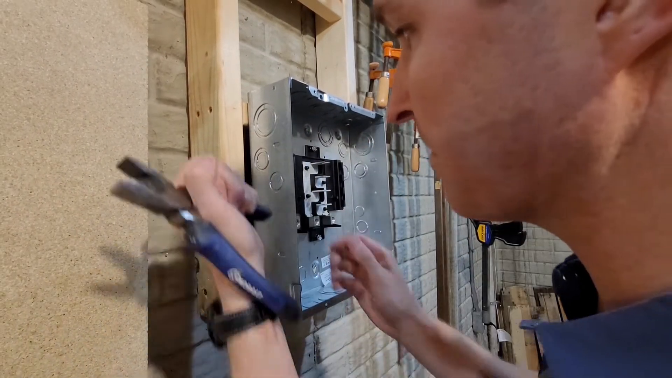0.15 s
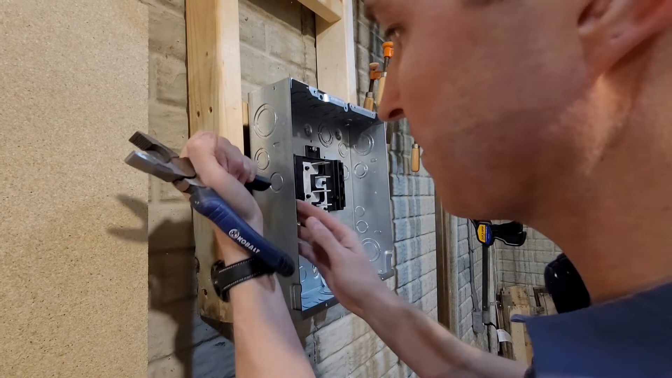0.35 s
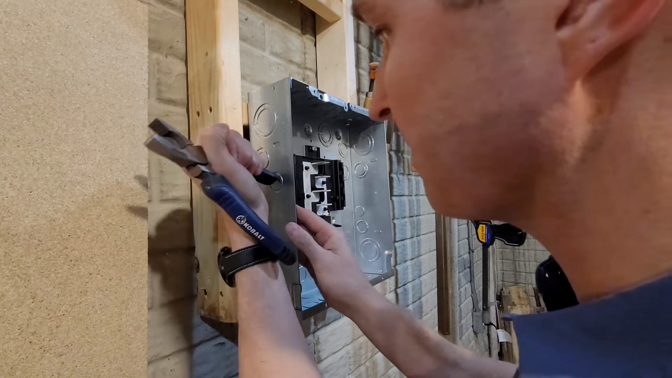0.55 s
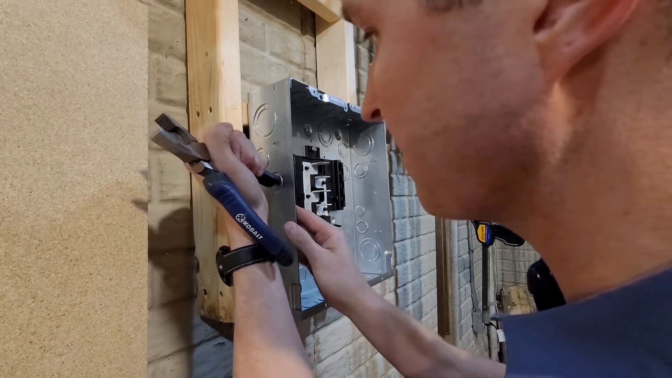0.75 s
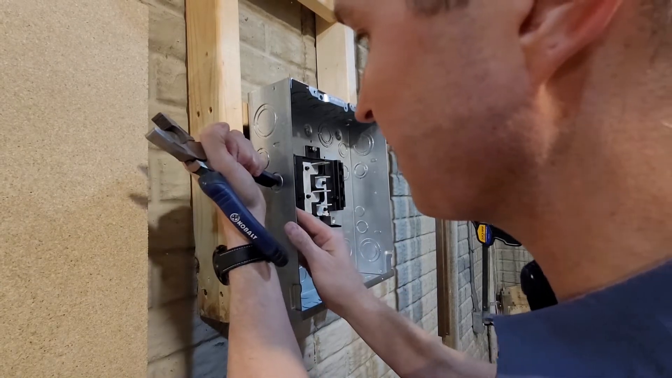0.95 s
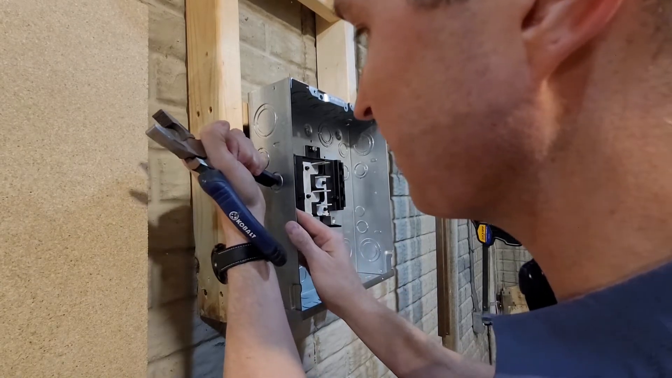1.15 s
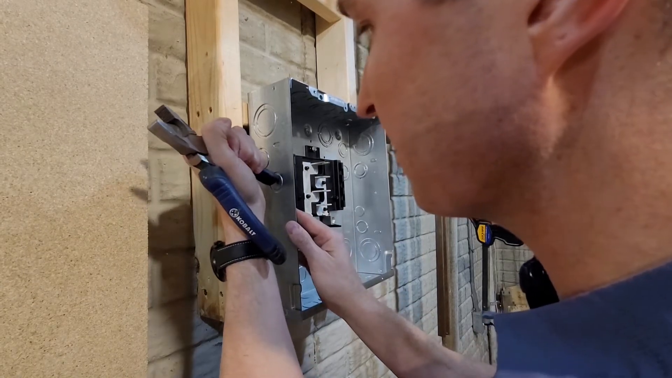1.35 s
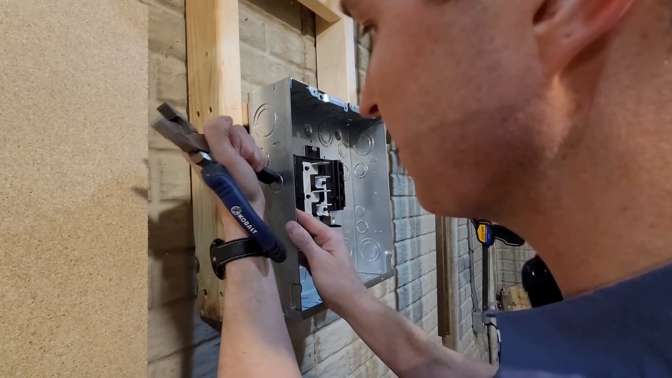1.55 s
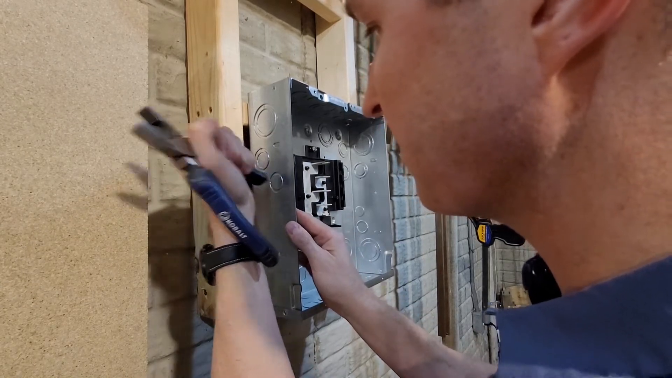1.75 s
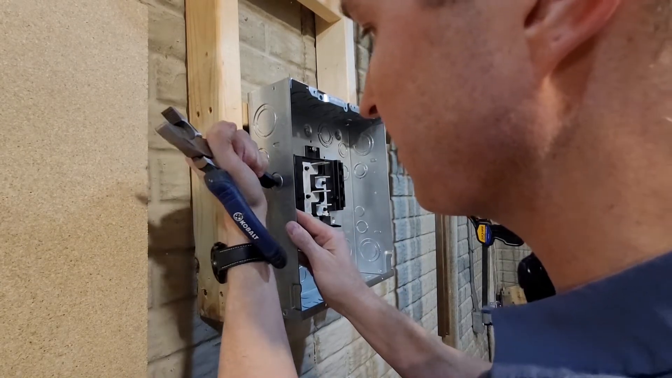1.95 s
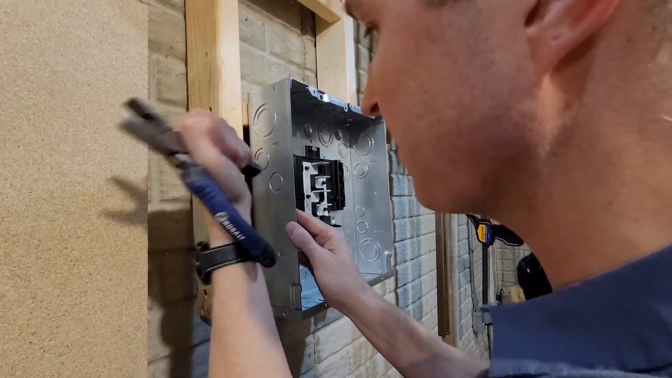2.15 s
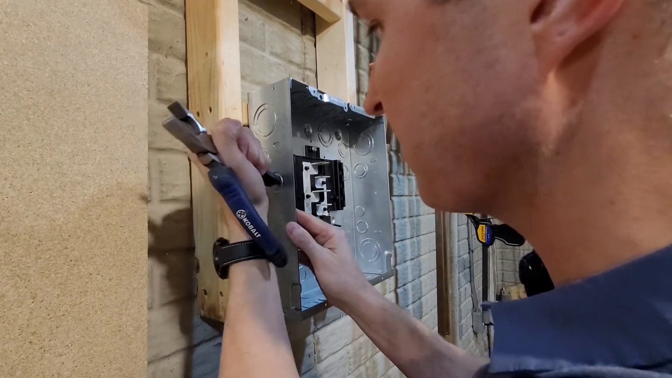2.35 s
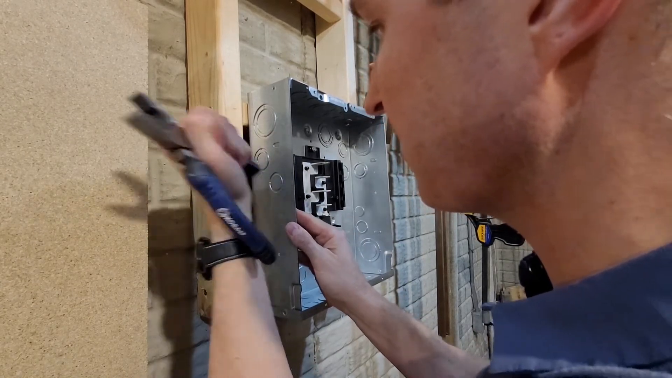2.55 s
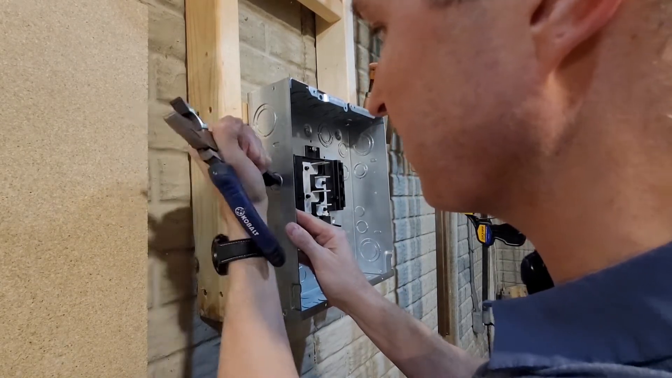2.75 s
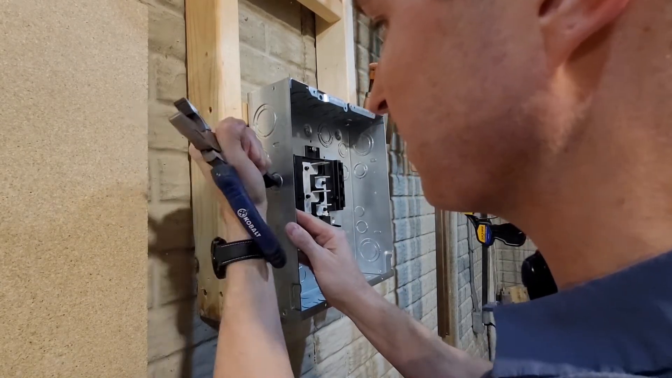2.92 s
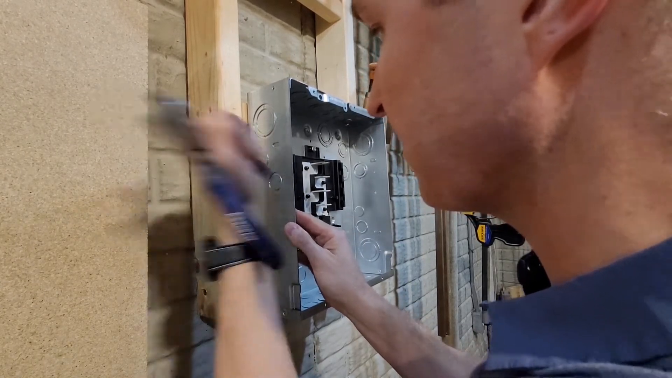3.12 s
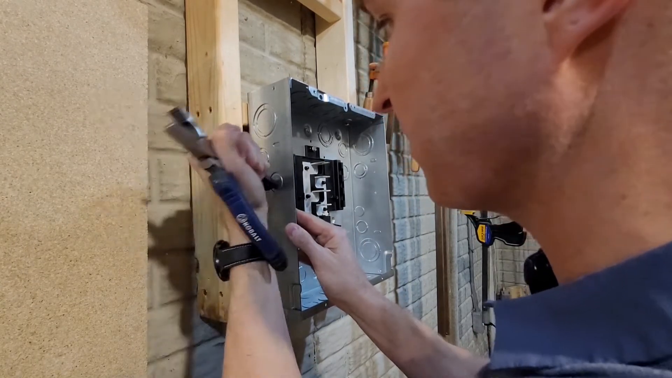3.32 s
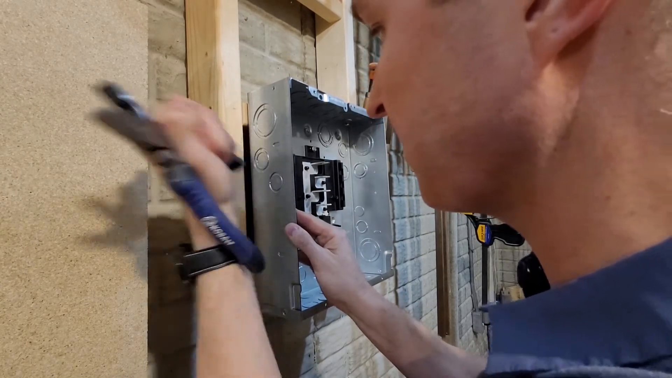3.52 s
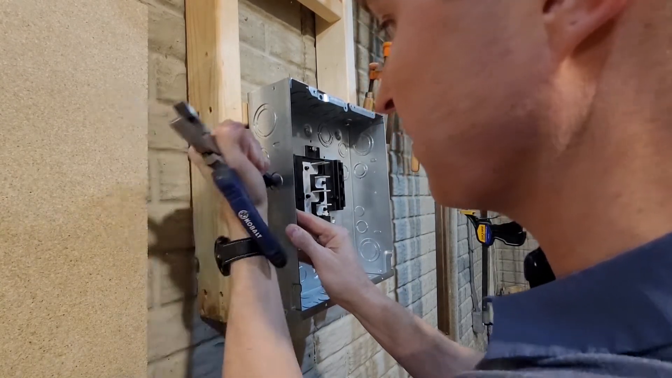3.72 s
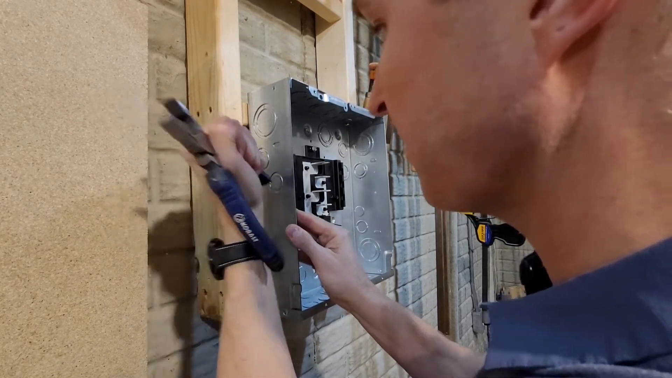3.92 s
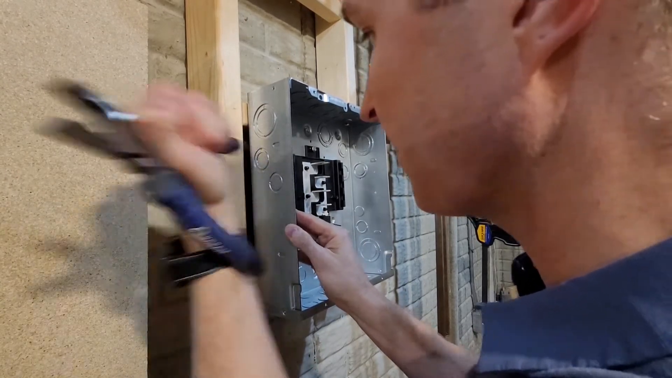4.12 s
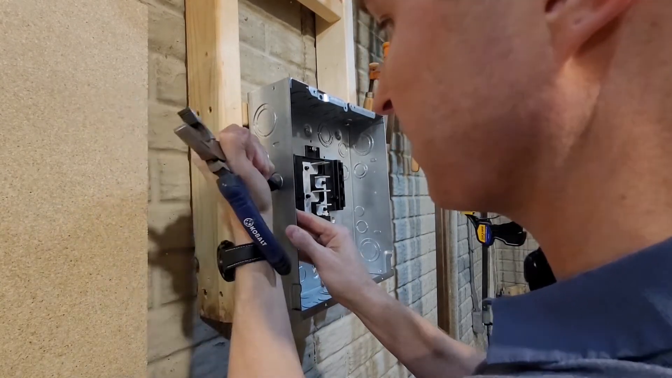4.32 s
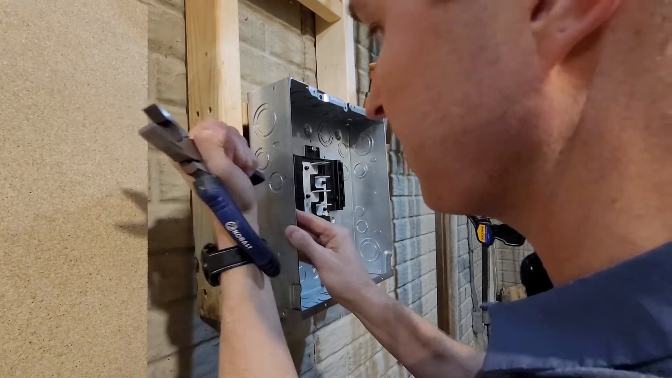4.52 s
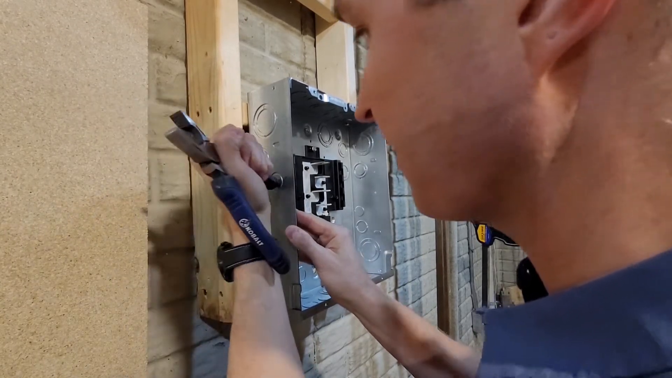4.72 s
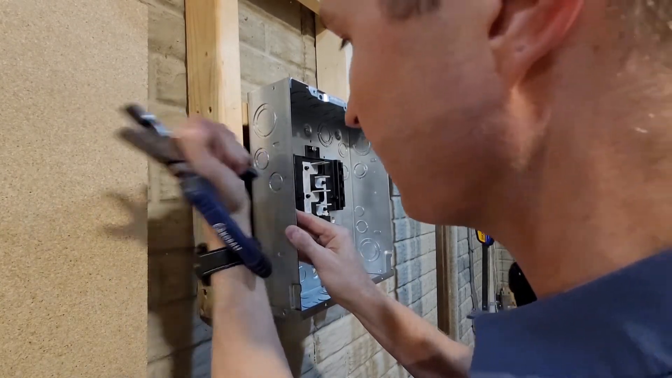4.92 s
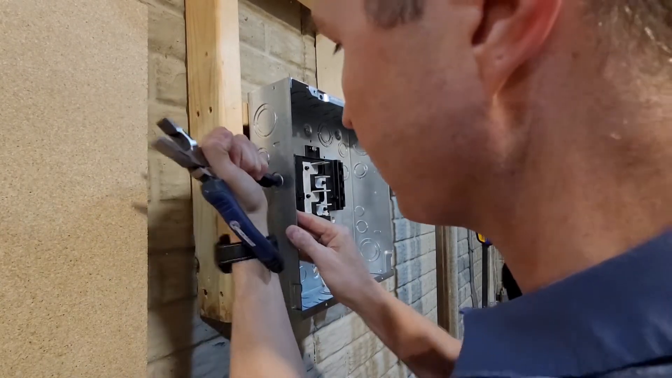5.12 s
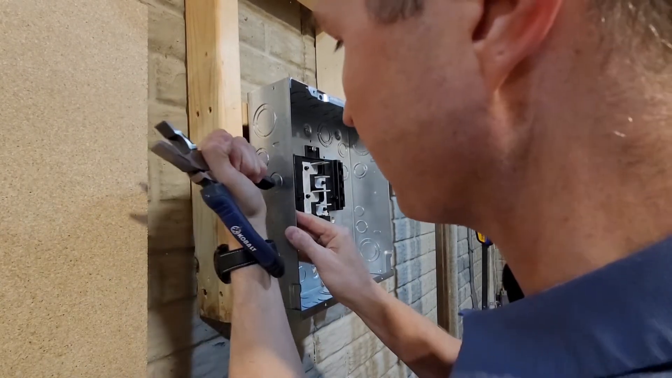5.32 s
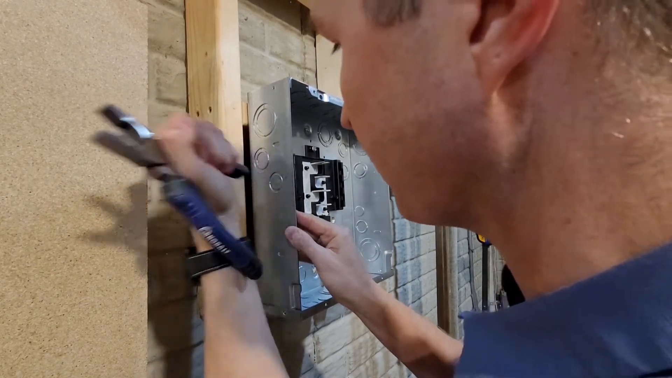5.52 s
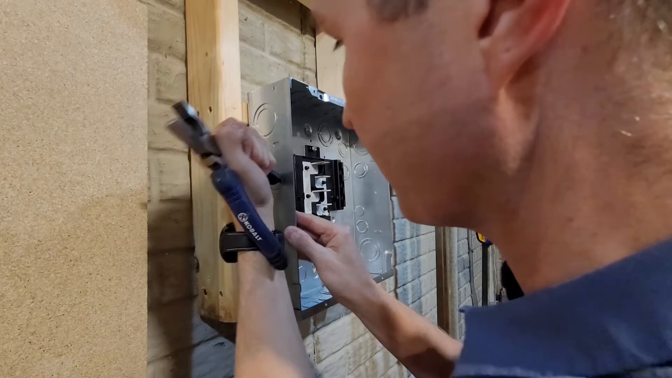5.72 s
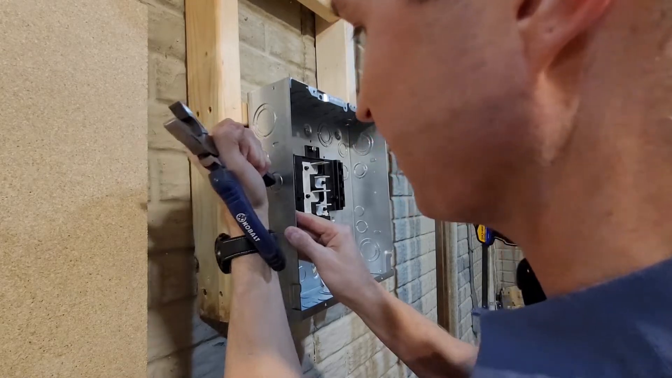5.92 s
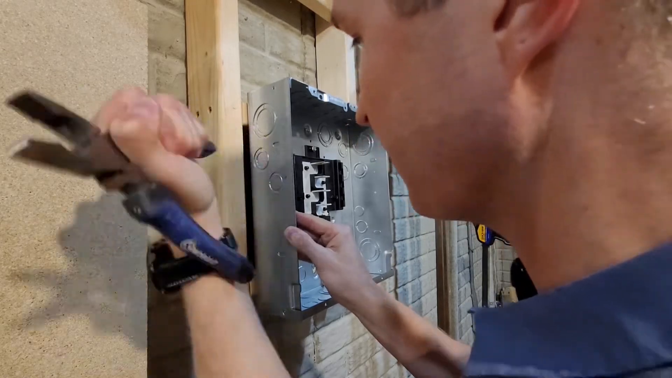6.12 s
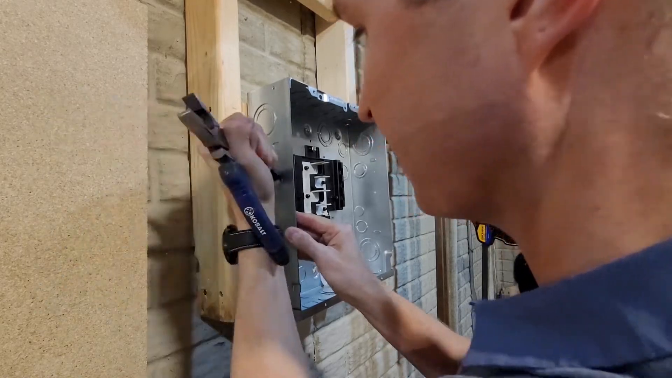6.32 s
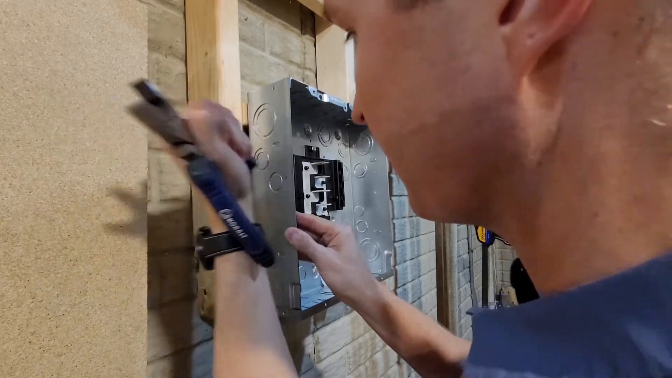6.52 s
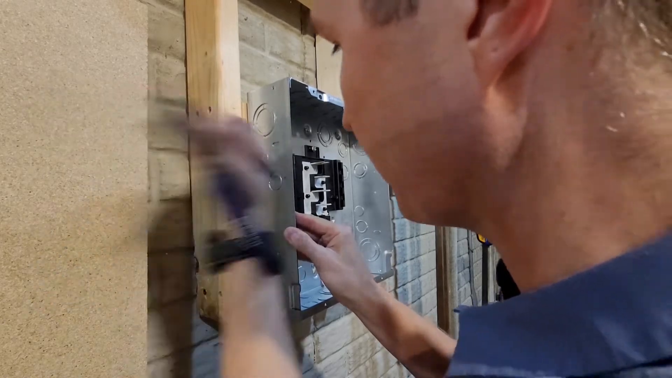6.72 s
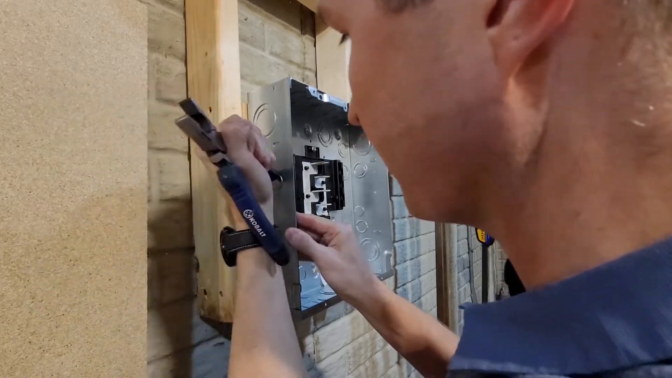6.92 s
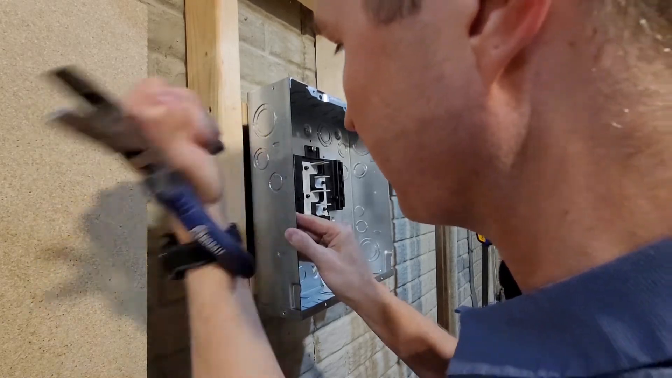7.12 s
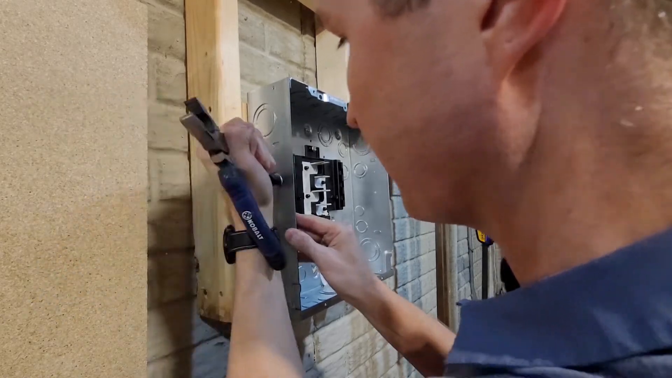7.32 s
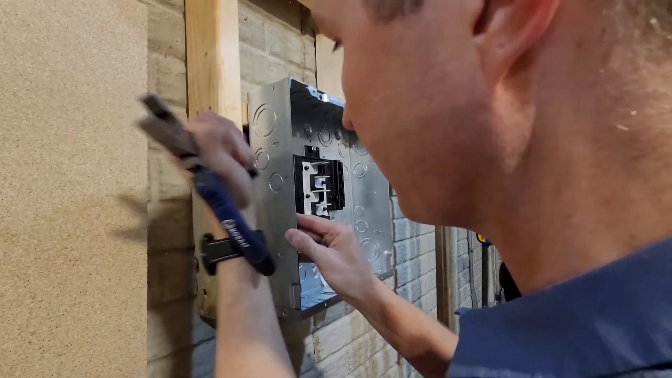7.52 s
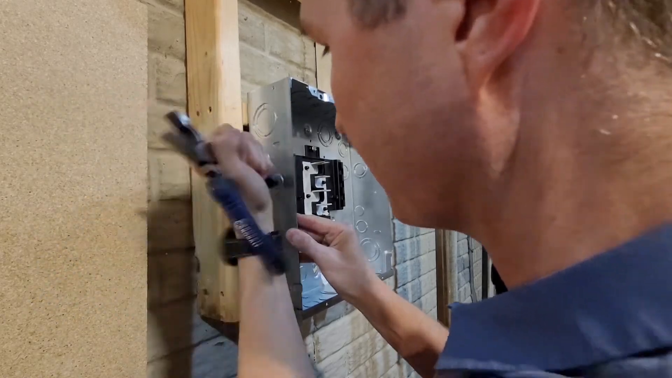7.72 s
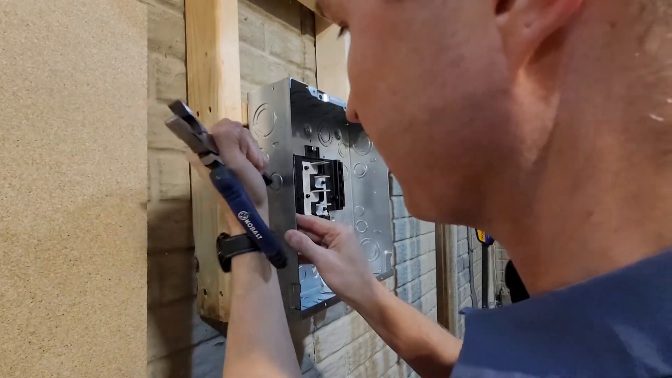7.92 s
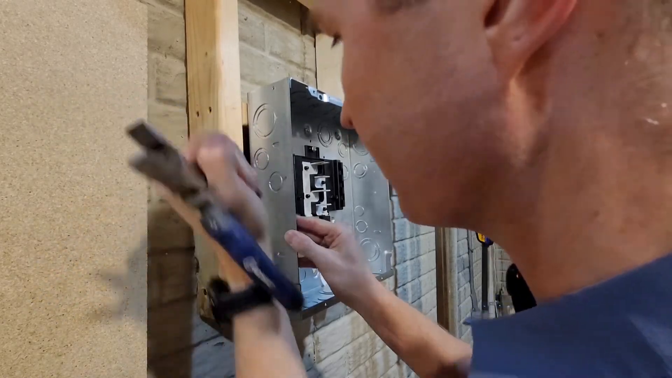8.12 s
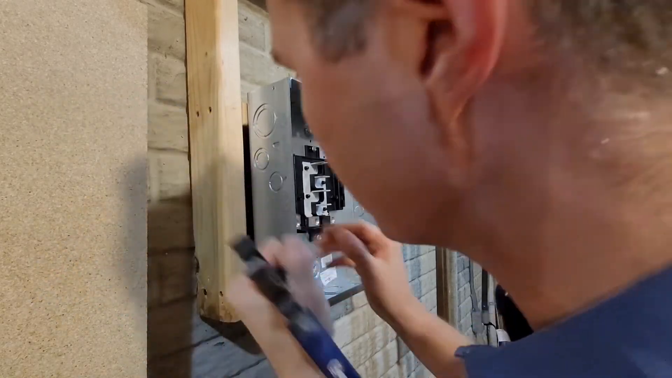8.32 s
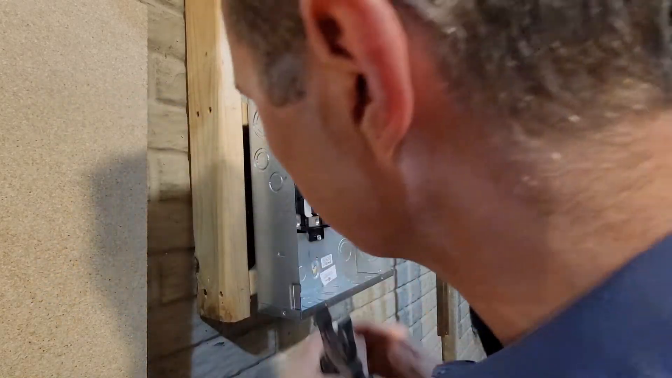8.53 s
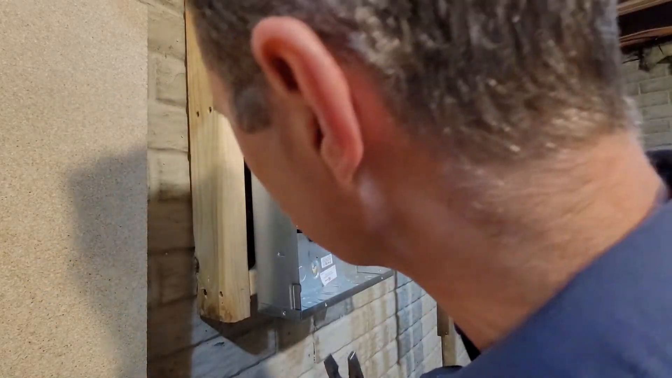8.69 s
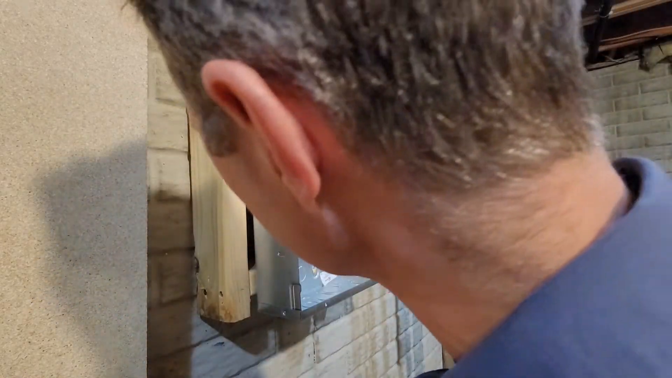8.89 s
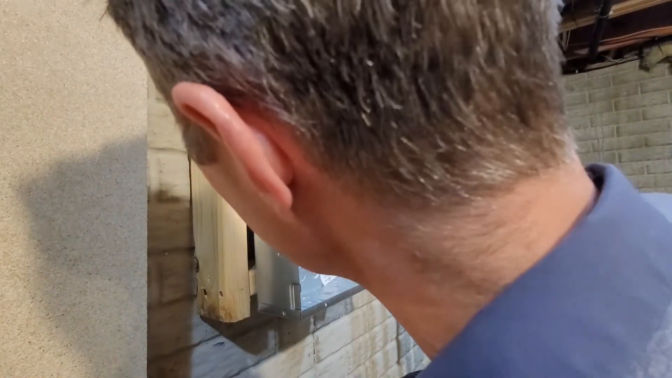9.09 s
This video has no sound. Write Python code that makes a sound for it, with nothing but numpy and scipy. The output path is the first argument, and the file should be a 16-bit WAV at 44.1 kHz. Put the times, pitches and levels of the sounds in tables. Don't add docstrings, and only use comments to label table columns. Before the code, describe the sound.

Close stereo pickup in a masonry basement. Water slaps and trickles faintly in a drain while a furnace hums low. A few light, dull taps find the spot, then pliers strike a steel electrical box about twice a second, each blow a hard crack with a short hollow clang and woody boom. Loose jaws tick on the rebound. The hammering stops and a soft rush of water remains.

```python
import sys
import numpy as np
from scipy import signal
from scipy.fft import rfft, irfft
from scipy.io import wavfile
from scipy.ndimage import uniform_filter1d

SR = 44100
rng = np.random.default_rng(int(sys.argv[2]) if len(sys.argv) > 2 else 0)


def put_to_file(sound):
    columns = np.atleast_2d(sound).T
    safe = np.clip(columns, -1, 1)
    whole_steps = np.round(safe * 32767)
    wavfile.write(sys.argv[1], SR, whole_steps.astype(np.int16))


def magnitude_from_level(level_db):
    exponent = np.asarray(level_db, float) / 20
    return 10 ** exponent


N = 408132


def unit(x):
    return x / np.sqrt(np.mean(x ** 2) + 1e-20)


def along(points, hz, column=1):
    rows = np.transpose(points)
    return np.interp(np.log(hz + 1), np.log(rows[0] + 1), rows[column])


def level_curve(rows):
    s, db = np.transpose(rows)
    return np.interp(np.arange(N) / SR, s, db, left=-120)


def add(track, s, sound):
    start = max(round(s * SR), 0)
    track[:, start:start + sound.shape[1]] += sound[:, :track.shape[1] - start]


# (frequency [Hz], correlation [-1..1])
LIKENESS = [(60, 0.93), (180, 1), (550, -0.3), (1650, -0.18), (4970, 0.073), (15000, -0.094)]


def stereo(white, spectrum):
    hz = np.fft.rfftfreq(white.shape[1], 1 / SR)
    turn = np.arccos(np.clip(along(LIKENESS, hz), -1, 1)) / 2
    mid, side = rfft(white) * magnitude_from_level(along(spectrum, hz)) * [np.cos(turn), np.sin(turn)]
    return unit(irfft([mid + side, mid - side], white.shape[1]))


def patchy(spectrum, patchy_db):
    z = signal.stft(rng.standard_normal((2, N + 512)), nperseg=512)[2]
    field = uniform_filter1d(rng.standard_normal(z.shape[1:]), size=8, axis=0)
    field = uniform_filter1d(field, size=8, axis=1)
    white = signal.istft(z * magnitude_from_level(patchy_db * unit(field)), nperseg=512)[1]
    return stereo(white, spectrum)[:, :N]


def lifted(x, peaks, lift_db):
    hz = np.fft.rfftfreq(x.shape[1], 1 / SR)
    gain = 1 + sum(magnitude_from_level(db + lift_db) / (1 + (2 * (hz - c) / w) ** 2) for c, w, db in peaks)
    return unit(irfft(rfft(x) * gain, x.shape[1]))


def banded(white, depth_db, width, first=0):
    z = rfft(white)
    ripple = unit(uniform_filter1d(rng.standard_normal(z.shape[1]), width))
    ripple = ripple * (np.arange(z.shape[1]) >= first)
    return unit(irfft(z * magnitude_from_level(depth_db * ripple), white.shape[1]))


def ring(modes, t, scatter_db, rise_s):
    hz, db, t60 = np.transpose(modes)[:, :, None]
    gain = magnitude_from_level(db + scatter_db * rng.standard_normal(hz.shape) - 60 * t / t60)
    return np.sum(gain * (1 - np.exp(-t / rise_s)) * np.sin(2 * np.pi * hz * t), axis=0)


# (time [s], level [dB])
FURNACE_LEVEL = [(0, -56.5), (2, -56), (3, -53.5), (8.2, -53.5), (8.8, -59), (9.25, -62.5)]
# (frequency [Hz], density [dB/Hz])
FURNACE_HUM = [(12, -72), (20, -19), (43, -49.5), (58, -4), (73, 9), (95, -3.5), (156, -15.5), (189, -6.5),
               (270, -5.5), (476, -12.5), (900, -21), (1170, -40), (1980, -120)]


def furnace():
    return magnitude_from_level(level_curve(FURNACE_LEVEL)) * patchy(FURNACE_HUM, patchy_db=1.6)


# (time [s], level [dB])
DRAIN_LEVEL = [(0, -56.5), (1.5, -55.5), (2.2, -55.5), (3, -61), (4.3, -61.5), (4.84, -62.5), (5.4, -60.5),
               (6, -66), (7.2, -60.5), (8.2, -58), (9.25, -52)]
# (frequency [Hz], density [dB/Hz])
TRICKLE_SPECTRUM = [(290, -8.5), (500, 1), (919, -10.5), (1320, -1.5), (1460, -3.5), (2360, -4), (4470, -8),
                    (7750, -20), (16000, -46.5)]
# (frequency [Hz], width [Hz], level [dB])
DRAIN_RESONANCES = [(1100, 56, 7.5), (1750, 120, 4), (2750, 500, -11.5)]


def trickle():
    water = lifted(patchy(TRICKLE_SPECTRUM, patchy_db=2.0), DRAIN_RESONANCES, lift_db=-6)
    return magnitude_from_level(level_curve(DRAIN_LEVEL)) * water


# (frequency [Hz], density [dB/Hz])
MIC_NOISE = [(300, -1.5), (2000, -1), (8000, -12.5), (16000, -5.5)]


def mic_hiss():
    return magnitude_from_level(-70) * stereo(rng.standard_normal((2, N)), MIC_NOISE)


# (time [s], pitch [Hz], level [dB])
WATER_SLAPS = [(0.0038, 1550, -50), (0.08, 2040, -47), (0.14, 2800, -48), (0.21, 2830, -44),
               (0.21, 4400, -50.5), (0.19, 2430, -54), (.222, 3800, -47), (.35, 5000, -57),
               (0.4, 4200, -50), (0.38, 1250, -53), (.4655, 660, -46), (0.48, 1900, -56), (.08, 4800, -56),
               (.95, 1700, -49.5), (0.993, 4700, -52), (1.391, 2600, -44), (1.291, 2400, -53),
               (4.672, 1430, -54.5), (4.71, 3600, -56), (4.935, 1300, -53), (4.93, 3000, -58),
               (1.195, 2930, -48), (1.03, 2200, -53), (.17, 690, -48.5), (.09, 610, -51), (.8, 2400, -52),
               (8.24, 780, -50.5), (5.63, 1470, -52), (5.42, 1800, -58), (.287, 7150, -71),
               (0.35, 3800, -50), (.365, 2300, -47), (.464, 2400, -48.5), (0.46, 1200, -47.5),
               (0.936, 1230, -49.5), (0.53, 3400, -52), (.878, 3400, -50), (.95, 2450, -48),
               (1.026, 3100, -56), (1.22, 4400, -52), (1.19, 1750, -45), (1.27, 2890, -66),
               (1.332, 1250, -47.5), (1.392, 3950, -42.5), (1.44, 3900, -70), (1.731, 2500, -49),
               (1.884, 2600, -43.5), (2.609, 3960, -53.5), (2.686, 2970, -51), (4.062, 4300, -56.5),
               (4.672, 2600, -52.5), (4.878, 3700, -57), (5.42, 2400, -57.5), (6.021, 4260, -59.5),
               (6.498, 4070, -62)]
# (time [s], centre [Hz], level [dB])
SPRAY = [(.004, 5600, -53), (.034, 8050, -57), (.072, 6600, -48.5), (.139, 6550, -72), (.184, 5150, -66),
         (.288, 6720, -48), (.68, 9750, -58), (.994, 6400, -49), (.996, 11500, -62), (1.146, 10080, -64),
         (1.29, 6630, -52), (1.423, 10200, -52), (1.71, 13300, -59), (1.716, 4870, -57),
         (1.788, 11500, -55), (2.15, 8640, -52), (2.529, 6000, -61), (2.617, 6300, -51),
         (2.617, 11500, -56), (3.531, 9000, -61.5), (4.015, 6580, -64.5), (4.066, 6550, -57.5),
         (4.472, 6350, -56), (4.532, 6850, -65), (4.632, 7830, -63.5), (4.861, 6700, -61),
         (5.41, 5880, -60), (5.62, 11800, -59), (6.221, 10950, -55.5), (7.17, 11500, -68)]


def splashes():
    out, t = np.zeros((2, N)), np.arange(8192) / SR
    hz = np.fft.rfftfreq(len(t), 1 / SR)
    slap_width, slap_s = 0.27, 0.04
    spray_width, spray_s = 0.43, 0.024
    stray_db, stray_octaves, length_scatter = -15.5, 1, 0.44
    rows = [(*r, slap_width, slap_s) for r in WATER_SLAPS]
    rows += [(*r, spray_width, spray_s) for r in SPRAY]
    for s, centre_hz, db, width, length_s in rows:
        stray, stretch = rng.standard_normal(2)
        peak = lambda c: 1 / (1 + (2.6 * (hz / c - 1) / width) ** 2)
        stray_hz = centre_hz * 2 ** (stray_octaves * stray)
        shape = peak(centre_hz) + magnitude_from_level(stray_db) * peak(stray_hz)
        noise = banded(rng.standard_normal((2, len(t))), 3, 24)
        burst = unit(irfft(rfft(noise) * shape))
        lasts_s = length_s * np.exp(length_scatter * stretch)
        fade = magnitude_from_level(-7 * t / lasts_s - 60 * np.maximum(t - lasts_s, 0) / 0.1)
        add(out, s, magnitude_from_level(db - 3.0) * burst * (1 - np.exp(-t / 0.0027)) * fade)
    return out


# (frequency [Hz], density [dB/Hz])
BODY_SPECTRUM = [(15, -45), (25, 2.5), (64, -6), (140, -8.5), (176, -13), (215, -4), (270, -6.5), (320, -5),
                 (400, -1.5), (520, -3), (641, -3.5), (887, -6.5), (1250, -12.5), (1560, -18), (1840, -17),
                 (3520, -25), (6050, -20), (16000, -31)]
# (frequency [Hz], rise [s], t60 [s])
BAND_RING = [(40.4, 0.13, 0.33), (85, 0.11, 0.47), (125, 0.004, 0.53), (243.4, 0.002, 0.29),
             (450, 0.011, 0.33), (750, 0.0055, 0.32), (1152, 0.00026, 0.32), (3040, 0.00012, 0.23),
             (6820, 0.002, 0.24), (14000, 0.0071, 0.13)]
# (frequency [Hz], level [dB])
LATE_TAIL = [(40, -30), (150, -46.5), (400, -29), (1000, -70), (3000, -62)]


def wash(white, t, boom_db, clang_db, fizz_db, damping):
    hz = np.fft.rfftfreq(len(t), 1 / SR)
    colour = [(250, boom_db + 16.5), (900, 0.014), (2500, clang_db + 16.0),
              (8000, fizz_db + 12.5), (15000, 1.3 * (fizz_db + 20.5))]
    z = rfft(stereo(white, BODY_SPECTRUM)) * magnitude_from_level(along(colour, hz))
    centres_hz = np.geomspace(30, 16000, 14)
    out = np.zeros((2, len(t)))
    for k, c in enumerate(centres_hz):
        share = along(np.transpose([centres_hz, np.arange(len(centres_hz)) == k]), hz)
        rise_s = max(along(BAND_RING, c), 1e-4)
        t60 = along(BAND_RING, c, column=2) / damping
        decay = magnitude_from_level(-60 * t / t60) + magnitude_from_level(along(LATE_TAIL, c) - 60 * t / 2.2)
        out += irfft(z * share, len(t)) * (1 - np.exp(-t / rise_s)) * decay / np.sqrt(t60)
    return out


# (time [s], peak [dB], boom [dB], clang [dB], knock [dB])
AIMING_TAPS = [
    (0.4646, -38.5, -16, -26, -20),
    (0.6385, -9.5, -18, -24.5, -13),
    (1.578, -13, -15.5, -12.5, -10),
    (1.679, -27, -9.5, -33, -10.5),
    (4.7706, -18, -12.5, -23.5, -11.5),
]
# (frequency [Hz], level [dB], t60 [s])
TAP_MODES = [(387, -5.5, 0.38), (773, 1.5, 0.13), (876, 12, 0.059), (638, 0.5, 0.08), (1580, -3, 0.12),
             (286, -7, 0.3), (2540, -6.5, 0.072), (2810, -15, 0.089)]
# (frequency [Hz], level [dB], t60 [s])
DISC_MODES = [(1245, 0, .045), (1170, -3, .035), (1030, -1, .04), (2150, -13, .025), (2330, -13, .025),
              (3300, -18, .01)]
# (delay [s], level [dB], pitch [Hz])
STUD_THUMPS = [(.019, -6, 423), (.038, -0.5, 400), (0.046, -11, 440), (.067, -10, 420), (0.091, -26, 394)]


def taps():
    out, t = np.zeros((2, N)), np.arange(SR // 2) / SR
    for s, db, boom_db, clang_db, knock_db in AIMING_TAPS:
        white = rng.standard_normal((2, len(t)))
        add(out, s + 0.0011, magnitude_from_level(db - 16.0) * wash(white, t, boom_db, clang_db, -25.5, 1.12))
        knock = ring(TAP_MODES, t, 1, .002) + magnitude_from_level(5) * ring(DISC_MODES[:3], t, 1, .0005)
        tick = uniform_filter1d(rng.standard_normal(len(t)), size=8)
        knock += magnitude_from_level(clang_db + 19 - 60 * t / .02) * tick
        for delay_s, thump_db, pitch_hz in STUD_THUMPS:
            thump = ring([(pitch_hz, thump_db, .02)], t[:4096], 1, .0012)
            add(out, s + delay_s, magnitude_from_level(db - 6) * thump * [[1], [.8]])
        add(out[:1], s + 0.0023, magnitude_from_level(db + knock_db - 5) * knock[None])
        add(out[1:], s + 0.0026, magnitude_from_level(db + knock_db - 3.0) * knock[None])
    return signal.sosfilt(signal.butter(4, 4480, fs=SR, output='sos'), out)


def ring_pair(modes, t60, t, scatter_db, rise_s, turn):
    apart_hz = 420
    hz, left_db, right_db = np.transpose(modes)[:3, :, None]
    fade = magnitude_from_level(scatter_db * rng.standard_normal(hz.shape) - 60 * t / t60) * (1 - np.exp(-t / rise_s))
    swing = 2 * np.pi * hz * t
    right_swing = swing + turn * np.minimum(hz / apart_hz, 1) ** 2
    left = np.sum(magnitude_from_level(left_db) * fade * np.sin(swing), axis=0)
    right = np.sum(magnitude_from_level(right_db) * fade * np.sin(right_swing), axis=0)
    return np.array([left, right])


def crack(t):
    sos = signal.butter(2, (1500, 7000), 'band', fs=SR, output='sos')
    return magnitude_from_level(-60 * t / .005) * unit(signal.sosfilt(sos, rng.standard_normal((2, len(t)))))


# (frequency [Hz], density [dB/Hz])
LEAD_IN_SPECTRUM = [(300, -22), (1300, -3.5), (2600, -13.5), (5000, -19), (9000, -29), (15000, -31.5)]


def lead_in(t):
    noise = banded(rng.standard_normal((2, len(t))), 7, 8)
    return stereo(noise, LEAD_IN_SPECTRUM) * magnitude_from_level(-60 * t[::-1] / .045)


# (time [s], peak [dB], plate share [dB], fizz [dB], boom [dB])
HARD_BLOWS = [(1.912, -7.5, -3, -31, -11.5), (2.287, -6.5, -5.5, -22, -10.5), (2.73, -7, -7, -22, -10.5),
              (3.192, -7.5, -11, -17.5, -12), (3.679, -7, -10.5, -16, -11.5), (4.223, -9, 2.5, -18.5, -11),
              (5.106, -6.5, -11.5, -17, -11.5), (5.723, -8, -5.5, -18, -11),
              (6.246, -7.5, -11.5, -17.5, -11.5), (6.786, -7.5, -17, -16.5, -9.5),
              (7.278, -7.5, -11, -18, -11), (7.743, -7.5, -10, -16, -11)]
# (frequency [Hz], left level [dB], right level [dB])
BOX_MODES = [(72.2, -38.5, -36), (120.84, -42, -41), (262.2, -36.5, -41.5), (295.3, -51, -32),
             (400, -35, -34), (489.4, -39.5, -36.5), (528, -42.5, -34), (602, -54, -38),
             (724.6, -42, -48.5), (772, -46, -42), (884, -40, -41.5), (980, -49.5, -50.5), (1083, -52, -47),
             (1180, -48.5, -43.5)]
# (frequency [Hz], rise [s])
BOX_RISE = [(70, .06), (120, .02), (255, .012), (480, .035), (800, .018), (1200, .004)]
# (frequency [Hz], left level [dB], right level [dB], t60 [s])
STUD_MODES = [(83, -34, -35, 1.3), (142, -35, -37, 1.2), (204, -27, -29, .45), (222, -42, -44, 1.1),
              (260, -32, -32, 1.5), (286, -30, -42, 1.5), (293, -42, -32, 1.5), (379, -38, -43, .7),
              (438, -40, -32, .7), (499, -40, -32, .7), (1245, -19, -21, .16), (1280, -20, -20, .16),
              (2154, -28, -29, .2), (2326, -28, -28, .2)]
# (frequency [Hz], level [dB], t60 [s])
PLATE_MODES = [(857, 0, 0.21), (757, 1.5, 0.13), (727.4, 4.5, 0.12), (632.6, 0.5, 0.16), (525, -9, 0.034)]
# (frequency [Hz], level [dB], t60 [s])
PANEL_MODES = [(401, -17, 0.17), (450, -23.5, .15)]
# (frequency [Hz], width [Hz], level [dB])
STEEL_RESONANCES = [(1574, 50, -5), (1910, 25, -2), (2330, 60, -5.5), (3620, 42, -17), (4220, 290, -4.5),
                    (4720, 16, -0.5), (5830, 88, -5.5), (6850, 300, -7), (7100, 21, -14), (8720, 81, -1.5),
                    (9700, 94, -6.5), (10400, 180, -8), (11500, 740, -5), (13540, 58, -10)]


def blows():
    out, t = np.zeros((2, N)), np.arange(SR * 3 // 4) / SR
    same = rng.standard_normal((2, len(t)))
    box_hz = np.transpose(BOX_MODES)[0]
    box_t60 = along(BAND_RING, box_hz, column=2)[:, None]
    box_rise_s = along(BOX_RISE, box_hz)[:, None]
    stud_t60 = np.transpose(STUD_MODES)[3][:, None]
    box_turn, stud_turn = rng.uniform(-np.pi, np.pi, (2, len(BOX_MODES), 1))
    swell_s, swell_spread_s, swell_db = .095, .04, 3
    ending = np.clip((t[-1] - t) / .15, 0, 1)
    ending = ending * magnitude_from_level(swell_db * np.exp(-((t - swell_s) / swell_spread_s) ** 2) - 1.28)
    panel_loss_db_per_s = 2.7
    for s, db, plate_db, fizz_db, boom_db in HARD_BLOWS:
        mix = 0.75 * same + 0.66 * rng.standard_normal(same.shape)
        mix = banded(mix, 3, width=14, first=1000)
        white = lifted(mix, STEEL_RESONANCES, lift_db=1.5)
        body = wash(white, t, boom_db - 1.0, -8.5, fizz_db, 0.95)
        add(out, s + 0.002, magnitude_from_level(db - 7.0) * ending * body)

        pair = magnitude_from_level(boom_db + 35.5) * ring_pair(BOX_MODES, box_t60, t, 2.3, box_rise_s, box_turn)
        pair += ring_pair(STUD_MODES, stud_t60, t, 3.6, 0.0057, stud_turn)
        add(out, s + .0013, magnitude_from_level(db) * ending * pair)

        panel_db = db - panel_loss_db_per_s * (s - HARD_BLOWS[0][0])
        plate = -magnitude_from_level(db + plate_db - 6.5) * ring(PLATE_MODES, t, 5.0, 0.0028)
        plate += magnitude_from_level(panel_db) * ring(PANEL_MODES, t, 1.2, 0.015)
        add(out[:1], s + .0014, plate[None])
        add(out[1:], s + .00115, plate[None])

        add(out[:1], s + .001, -magnitude_from_level(db + 1) * ring(DISC_MODES, t, 1.5, .0003)[None])
        add(out[1:], s + .00185, -magnitude_from_level(db + 4) * ring(DISC_MODES, t, 1.5, .0022)[None])
        add(out, s + .001, magnitude_from_level(db - 4) * crack(t[:512]))
        add(out, s + 0.0014 - 1024 / SR, magnitude_from_level(db - 17.5) * lead_in(t[:1024]))
    return out


# (time [s], level [dB])
JAW_CLACKS = [(1.921, -37.5), (2.308, -20.5), (2.7391, -17.5), (2.7478, -19.5), (3.206, -18.5),
              (3.6903, -22), (3.7153, -23), (4.2421, -14), (5.117, -24), (5.1429, -23.5), (5.7344, -15),
              (6.2593, -11), (6.266, -17), (6.7998, -11), (7.2879, -12), (7.7516, -27), (7.7548, -13)]


def clacks():
    out, t = np.zeros((2, N)), np.arange(512) / SR
    left_over_right_db = -4.5
    pan_db = left_over_right_db / 2 * np.array([[1], [-1]])
    shape = magnitude_from_level(-60 * t / .012) * (1 - np.exp(-t / .0004))
    for s, db in JAW_CLACKS:
        bright = np.diff(rng.standard_normal((2, 513)))
        tick = lifted(bright, STEEL_RESONANCES, lift_db=16.5)
        add(out, s, magnitude_from_level(db + 4.5 + pan_db) * tick * shape)
    return out


# (time [s], level [dB])
VALVE_LEVEL = [
    (7.1, -93),
    (7.24, -70.5),
    (7.41, -65),
    (7.99, -58.5),
    (8.6, -56),
    (9.25, -55),
]
# (frequency [Hz], density [dB/Hz])
VALVE_HISS = [(880, -35.5), (1500, -6.5), (2150, -12.5), (2330, -2), (6230, -0.5), (9990, -4),
              (15100, -2.5), (16000, -19), (16500, -26)]
# (frequency [Hz], width [Hz], level [dB])
PIPE_RESONANCES = [(2890, 24, 3.5), (3840, 35, -7.5), (4810, 26, 5.5), (5300, 29, 7), (6220, 80, 4.5),
                   (6675, 280, -4.5), (12500, 50, -10), (13670, 51, -9)]
# (frequency [Hz], density [dB/Hz])
FLOW_SPECTRUM = [(470, -41), (800, 2.5), (989, -15), (1140, -1), (1600, -31.5), (1800, 7), (2180, -2),
                 (4990, 5.5), (8000, -42.5), (10400, -63), (17600, -120)]


def rush():
    rush_db = level_curve(VALVE_LEVEL)
    full_open_db, flow_db_per_db = -52, .8
    hiss = magnitude_from_level(9.0) * lifted(patchy(VALVE_HISS, patchy_db=2.3), PIPE_RESONANCES, lift_db=3.5)
    flow_db = 2.5 + flow_db_per_db * (rush_db - full_open_db)
    flow = magnitude_from_level(flow_db) * patchy(FLOW_SPECTRUM, patchy_db=0.5)
    return magnitude_from_level(rush_db) * (hiss + flow)


# (frequency [Hz], left over right [dB])
BOX_LEAN = [(60, 1), (150, 3.5), (380, -1.5), (950, -1), (2380, 0.5), (5980, 1.5), (15000, -2.5)]


def scene():
    hz = np.fft.rfftfreq(N, 1 / SR)
    lean = magnitude_from_level(along(BOX_LEAN, hz) / 2 * [[1], [-1]])
    box = irfft(rfft(taps() + blows()) * lean, N)
    far = furnace() + trickle() + mic_hiss() + splashes() + rush()
    left_lag_samples = 20
    return box + clacks() + [np.roll(far[0], left_lag_samples), far[1]]


def top_cut(x):
    return signal.sosfilt(signal.butter(12, 16760, fs=SR, output="sos"), x)


def record(dry):
    top_hz = 15900
    soft = dry / (1 + np.abs(dry / 1.03) ** 6) ** (1 / 6)
    hz = np.fft.rfftfreq(N, 1 / SR)
    shelf_db = -26 * np.clip((hz - top_hz) / 250 + .5, 0, 1)
    return top_cut(irfft(rfft(soft) * magnitude_from_level(shelf_db), N))


dry = scene()
out = record(dry)
put_to_file(out)
```